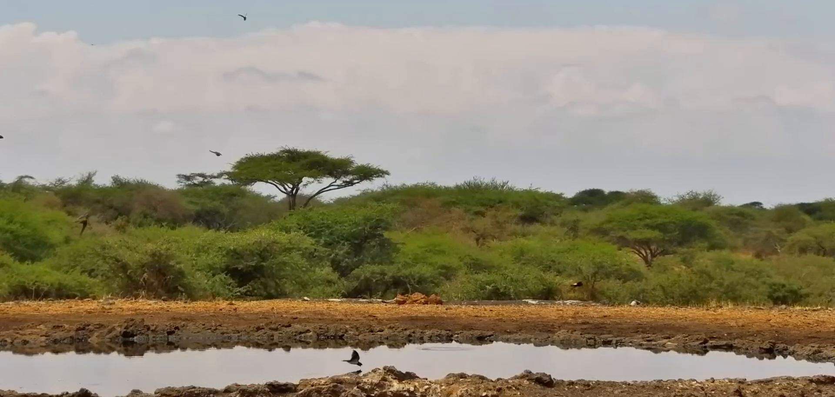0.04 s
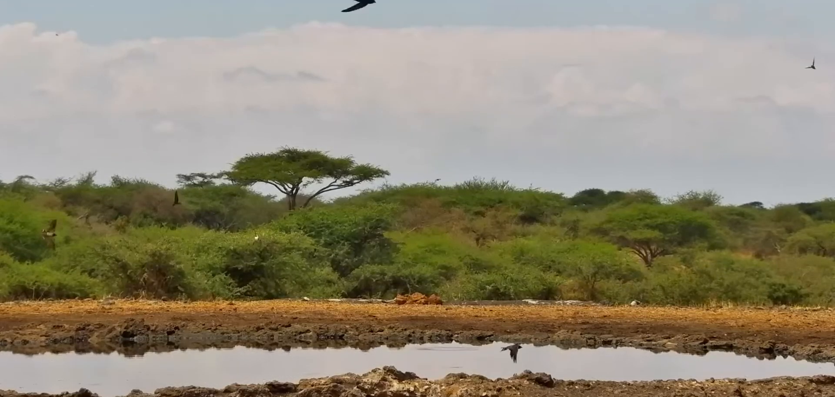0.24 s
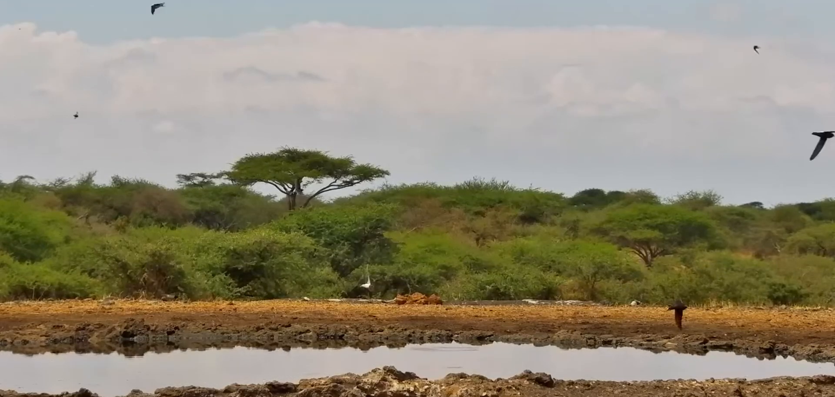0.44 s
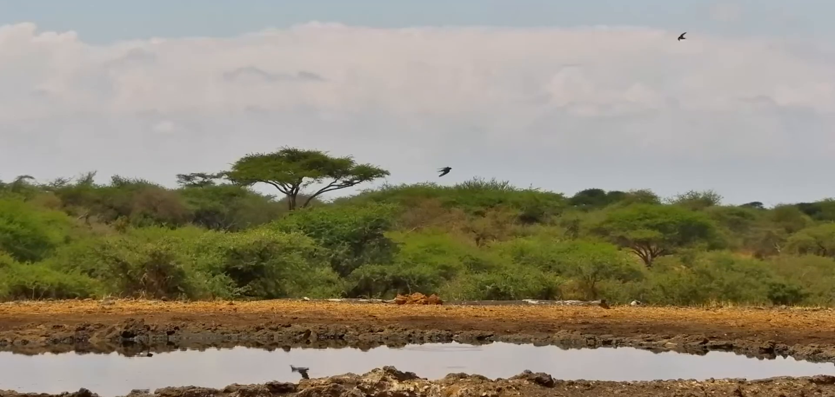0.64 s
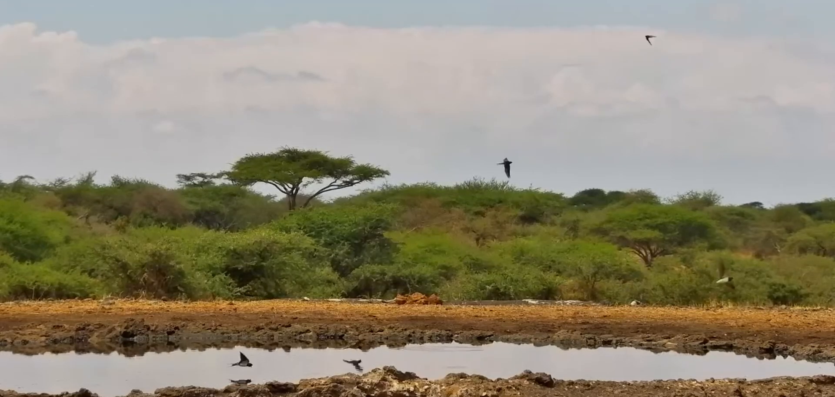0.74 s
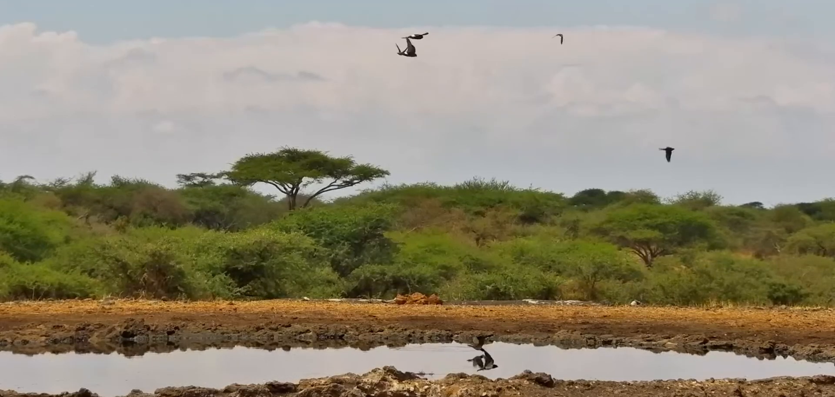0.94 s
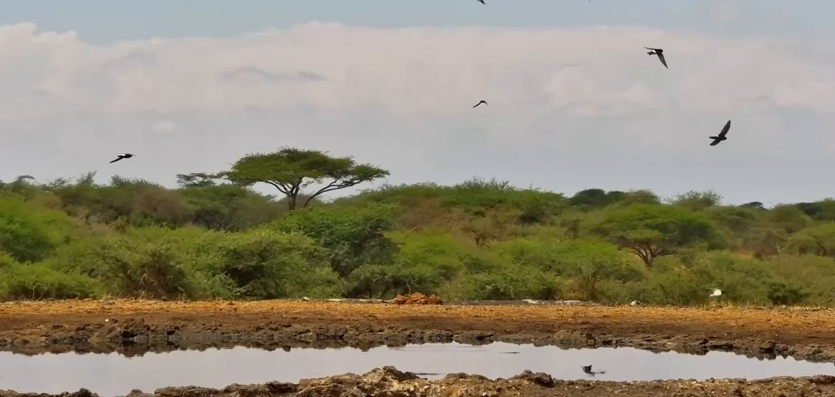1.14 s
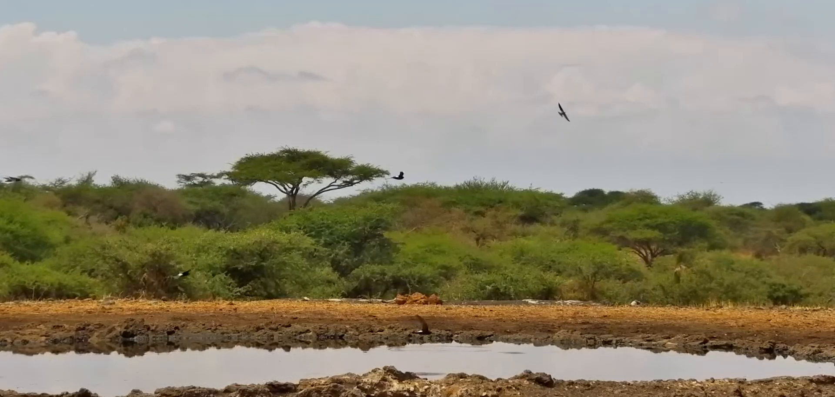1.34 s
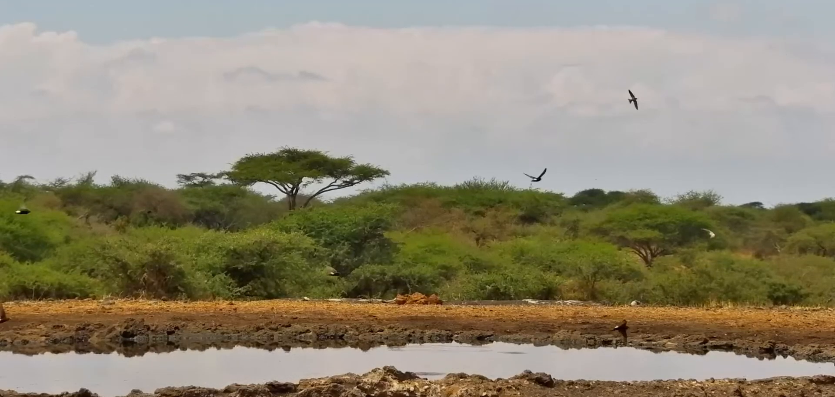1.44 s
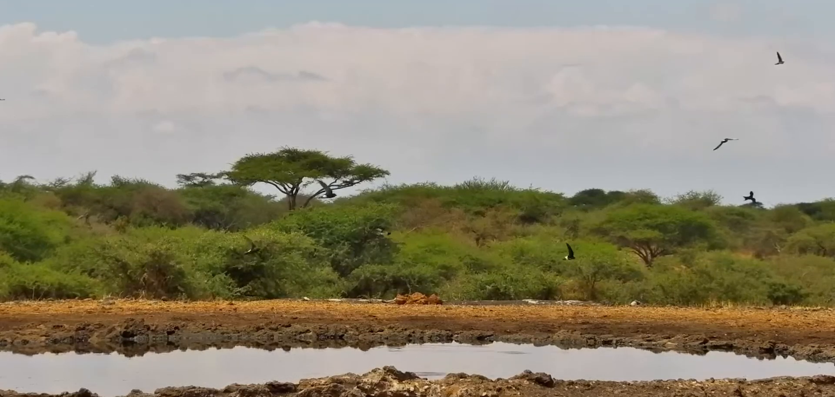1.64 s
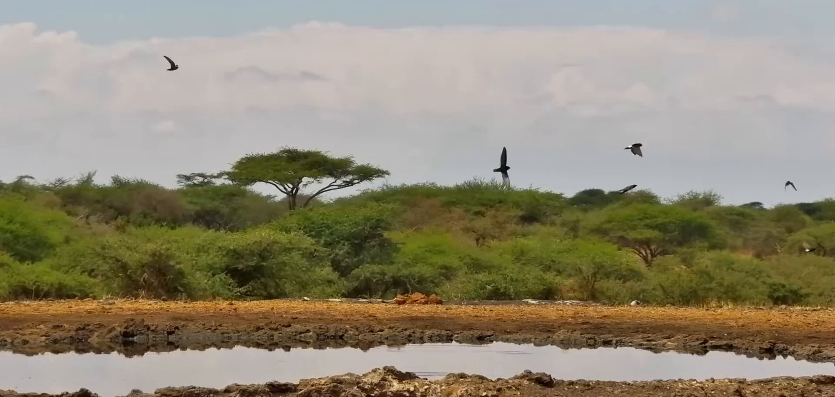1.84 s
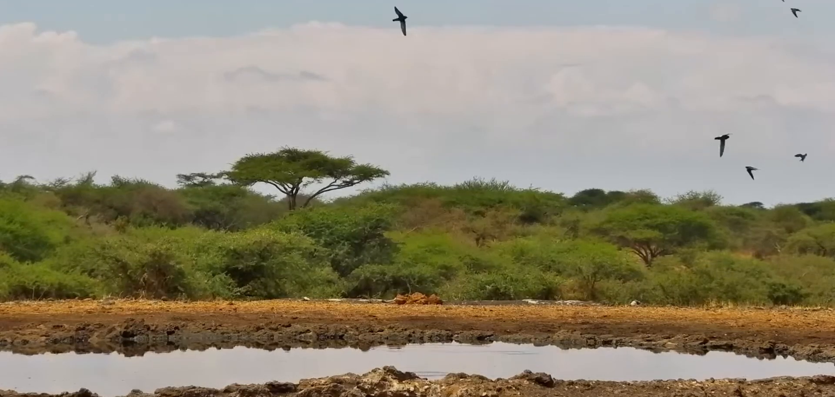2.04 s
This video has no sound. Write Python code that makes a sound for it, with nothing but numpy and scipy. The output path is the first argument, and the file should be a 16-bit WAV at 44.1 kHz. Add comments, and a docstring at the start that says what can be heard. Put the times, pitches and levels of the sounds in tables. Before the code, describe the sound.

Shrill, rapid trilling calls of passing swifts, first close and loud, then fainter and more crowded

```python
"""At a waterhole, swifts trill as they sweep over: short near-sine whistles slide and flick down at the end.
Each whistle gets one echo off the water and a tail of scattered echoes from the bush.
Shaped noise makes the faint rasps, one long faint whistle, the puffs of wind and the hiss;
wavering sines make the mains hum. The microphone housing colours the treble with resonances and a notch."""
import sys
import numpy as np
from scipy import signal
from scipy.fft import rfft, irfft
from scipy.io import wavfile
from scipy.ndimage import uniform_filter1d

SR = 44100
rng = np.random.default_rng(int(sys.argv[2]) if len(sys.argv) > 2 else 0)


def inscribe(sig):
    """Save sig as 16-bit PCM at rate SR to the path in sys.argv[1].

    A 1-D sig is mono; a 2-D sig holds one channel per row.
    Samples are clipped to [-1, 1] before scaling.
    """
    pcm = np.round(np.clip(np.atleast_2d(sig).T, -1, 1) * 32767)
    wavfile.write(sys.argv[1], SR, pcm.astype(np.int16))


N = 92610

# All levels hold before the microphone.
# Colour of the hiss, as points on a curve: pitch_hz, relative_level_db
HISS_COLOUR = [(20, -11), (50, -12), (100, 0), (190, -16.5), (600, -9), (760, -8.5), (900, -17),
               (1350, -10), (1750, -22.5), (2100, -18.5), (2850, -9.5), (3600, -19.5), (4300, -22.5),
               (5300, -20), (6100, -20), (7700, -36.5), (8900, -22), (10800, -28), (11200, -21),
               (11800, -34)]
HISS_DB, HISS_FLICKER_DB, HISS_TOP_HZ = -51.5, 1.0, 11900

# Mains hum tones: pitch_hz, level_db
HUM_TONES = [(150.7, -60.5), (247.6, -66), (349.9, -65.5)]
HUM_WAVER_DB = 2

# Wind puffs on the microphone: middle_s, length_s, top_hz, level_db
WIND_PUFFS = [(0.095, 0.055, 660, -48), (0.184, 0.061, 755, -47.5), (0.714, 0.023, 513, -51.5),
              (0.76, .04, 69, -53), (0.801, 0.15, 780, -50), (1.303, 0.048, 720, -49),
              (1.32, 0.1, 61.6, -55), (1.416, 0.041, 800, -51.5), (1.936, 0.0094, 700, -49),
              (2.028, 0.076, 510, -56.5)]

# Rasps, and one faint long whistle near 1390 Hz, all as band noise:
# middle_s, length_s, low_hz, high_hz, level_db
RASP_BANDS = [(0.331, 0.079, 1170, 2190, -50), (0.607, 0.082, 1084, 1760, -53.5),
              (0.934, 0.096, 1110, 1950, -51), (1.264, 0.086, 930, 1580, -50),
              (1.269, 0.074, 2300, 2720, -45.5), (1.27, 0.52, 1385, 1390, -57.5),
              (1.393, 0.024, 1210, 1560, -50), (1.72, 0.081, 1020, 1380, -49.5),
              (1.717, 0.087, 2140, 3150, -41), (1.743, 0.053, 2330, 2680, -40),
              (1.81, 0.073, 1240, 2180, -53.5), (2.075, 0.027, 1230, 1590, -52)]
RASP_GRAIN_DB, RASP_GRAIN_RATE_HZ = -1.5, 170  # the sign only flips the random walk

# Level of the flock's chatter over time: time_s, level_db
CHATTER_LEVEL = [(1.018, -61), (1.05, -43.5), (1.3, -42), (1.55, -46.5), (1.8, -52)]
CHATTER_COUNT = 280
CHATTER_LOW_HZ, CHATTER_HIGH_HZ, CHATTER_SLIDE_HZ = 2600, 5100, 800

# Trill notes: start_s, length_s, first_pitch_hz, last_pitch_hz, level_db
TRILL_NOTES = [(0.027, .012, 2860, 2740, -54), (0.184, 0.0075, 2790, 2640, -42.5),
               (0.192, 0.01, 4980, 5320, -36.5), (0.2, 0.015, 6040, 6040, -24),
               (0.211, 0.01, 4640, 4380, -32), (0.223, 0.0064, 4250, 2880, -20.5),
               (0.26, 0.0073, 4710, 4420, -30), (0.268, 0.019, 4210, 3966, -22.5),
               (0.283, .007, 3780, 2560, -27), (.289, 0.012, 5300, 5120, -31),
               (.290, 0.006, 3440, 4300, -27), (0.319, .005, 4955, 5180, -14.5),
               (0.325, 0.0066, 5090, 5410, -13.5), (0.332, 0.0075, 4520, 3494, -19.5),
               (0.373, 0.014, 3630, 4396, -20), (0.386, 0.0071, 4020, 2830, -30.5),
               (0.418, 0.019, 4908, 4696, -15.5), (0.461, 0.016, 4775, 4620, -17),
               (.505, 0.015, 4697, 4365, -19.5), (0.542, 0.01, 4347, 3853, -24.5),
               (0.574, 0.0098, 4490, 3840, -23), (0.604, 0.014, 4060, 3790, -28.5),
               (.632, 0.0079, 3900, 3770, -24), (0.656, .010, 3760, 3655, -26),
               (0.683, 0.011, 3617, 3580, -26.5), (0.704, 0.0035, 3760, 3320, -28.5),
               (.708, 0.0045, 4600, 5100, -37.5), (1.007, 0.0097, 6050, 5970, -30),
               (1.018, 0.0091, 4740, 4370, -28), (1.027, 0.0057, 4060, 3417, -31.5),
               (1.029, 0.0088, 7030, 6730, -40), (1.04, 0.015, 5220, 5140, -30.5),
               (1.058, 0.0095, 3640, 2680, -36), (1.07, 0.014, 4484, 4360, -24.5),
               (1.085, 0.0067, 7200, 5960, -37.5), (1.099, 0.0085, 4550, 5360, -33),
               (1.106, 0.017, 4753, 4670, -26), (1.131, 0.0074, 4560, 4460, -26.5),
               (1.144, 0.016, 4850, 4730, -27.5), (1.17, 0.013, 3760, 4350, -29),
               (1.176, 0.028, 4970, 4810, -24), (1.213, 0.014, 3430, 4380, -32.5),
               (1.224, 0.018, 4030, 3782, -30.5), (1.236, 0.0089, 4570, 5200, -28),
               (1.247, 0.0062, 5260, 4640, -23.5), (1.26, 0.0065, 3430, 4000, -28),
               (1.272, 0.0094, 4586, 4780, -27), (1.298, 0.005, 3760, 3660, -29),
               (1.296, 0.022, 4750, 4820, -29), (1.329, 0.016, 3730, 3730, -38),
               (1.346, 0.0069, 4530, 4700, -33), (1.354, 0.015, 5020, 4480, -29.5),
               (1.37, 0.0055, 4810, 3930, -27.5), (1.409, 0.0041, 2970, 2860, -35),
               (1.412, 0.02, 4380, 4270, -31.5), (1.457, 0.015, 3920, 4290, -34.5),
               (1.493, 0.0083, 3780, 4780, -31.5), (1.501, 0.016, 4080, 3870, -32.5),
               (1.519, 0.0069, 3680, 3930, -36), (1.543, 0.021, 3375, 4330, -35),
               (1.585, 0.015, 3050, 4130, -40.5), (1.623, 0.0052, 3080, 3730, -34.5),
               (1.627, 0.017, 3910, 3960, -39), (1.651, 0.0058, 3840, 3800, -36),
               (1.66, 0.0055, 3060, 3900, -35.5), (1.665, 0.0095, 3760, 3900, -36),
               (1.695, 0.014, 3860, 3950, -37), (1.727, 0.008, 3890, 3830, -32.5),
               (1.76, 0.0076, 3820, 3800, -36.5), (1.801, 0.016, 3950, 3716, -49),
               (2.004, 0.025, 3364, 2464, -49.5)]

# High ticks of one bird: start_s, level_db
HIGH_TICKS = [(1.033, -36), (1.316, -40), (1.372, -42.5), (1.424, -44), (1.472, -49), (1.519, -52),
              (1.583, -43.5), (1.624, -49.5), (1.662, -48), (1.694, -49)]
TICK_S, TICK_HZ = 0.0095, 6150

# Shape of one whistle
ATTACK_S, RELEASE_S = .002, .003
FLICK_HZ, FLICK_S, FLICK_DB = 2560, 0.0075, -18
WAVER_DB, WAVER_HZ, WAVER_RATE_HZ = 1.2, 35, 300
BREATH_DB, BREATH_RATE_HZ = -15, 1800
OCTAVE_DB, OCTAVE_LIFT_DB, OCTAVE_LIFT_HZ, OCTAVE_LIFT_WIDTH_HZ = -35, 13, 6700, 600

# Echoes; a T60 is the time a tail takes to fall by 60 dB
MIRROR_MAX_S, MIRROR_DB = .013, -16
BUSH_DB, BUSH_T60_S, BUSH_BLUR_RATE_HZ = -8.5, .14, 1100
BUSH_DELAY_S, BUSH_PATCHY_DB = .008, 3.5
FAR_DB, FAR_T60_S = -18, .3
VOICE_LOW_HZ, AIR_HZ = 2250, 11100

# Resonances of the microphone housing: pitch_hz, width_hz, lift_db
HOUSING_RESONANCES = [(2780, 670, 2.5), (3817, 460, 5.5), (4640, 390, 5), (5380, 210, 8.5),
                      (5960, 220, 3.5), (6550, 69, 7.5)]
HOUSING_LOSS_DB, OVERLOAD, TOP_HZ = 5, .05, 16000
NOTCH_HZ, NOTCH_WIDTH_HZ = 5640, 390


def undb(db):
    """Turn decibels into a plain factor."""
    return 10 ** (np.asarray(db) / 20)


def walk(rate_hz, size):
    """Random levels, each held for 1 / rate_hz seconds, then smoothed twice; spread near 1."""
    hold = int(SR / rate_hz)
    steps = np.repeat(rng.standard_normal(size // hold + 1), hold)
    smooth = uniform_filter1d(uniform_filter1d(steps, hold), hold)
    return 2.05 * smooth[:size]


def noise(low_hz, high_hz):
    """Noise kept between two pitches, with an rms of 1."""
    band = signal.butter(2, [low_hz, high_hz], "bandpass", fs=SR, output="sos")
    x = signal.sosfilt(band, rng.standard_normal(N))
    return x / x.std()


def swell(middle_s, length_s):
    """A smooth bell-shaped rise and fall in time."""
    t = np.arange(N) / SR
    return np.exp(-.5 * ((t - middle_s) / (length_s / 3.72)) ** 2)


def hiss():
    """Steady noise, coloured by pitch, with a slight flicker in level."""
    hz = np.fft.rfftfreq(N, 1 / SR) + 1  # the 1 avoids log(0)
    point_hz, point_db = np.array(HISS_COLOUR).T
    colour = undb(np.interp(np.log(hz), np.log(point_hz), point_db))
    steep_top = 1 / np.sqrt(1 + (hz / HISS_TOP_HZ) ** 80)
    x = irfft(rfft(rng.standard_normal(N)) * colour * steep_top, N)
    return x / x.std() * undb(HISS_DB + HISS_FLICKER_DB * walk(5.83, N))


def hum():
    """Sines near odd multiples of the mains pitch, each wavering in level."""
    t = np.arange(N) / SR
    out = np.zeros(N)
    for hz, db in HUM_TONES:
        level = np.sqrt(2) * undb(db + HUM_WAVER_DB * walk(11.55, N))  # root 2 turns rms into peak
        out += level * np.sin(2 * np.pi * (hz * t + rng.random()))
    return out


def puffs():
    """Wind on the microphone: short low thumps of band noise."""
    out = np.zeros(N)
    for middle_s, length_s, top_hz, db in WIND_PUFFS:
        out += undb(db) * swell(middle_s, length_s) * noise(top_hz / 5, top_hz)
    return out


def rasps():
    """Rasps, and one faint long whistle from a very narrow band: noise with quick random changes of level."""
    out = np.zeros(N)
    for middle_s, length_s, low_hz, high_hz, db in RASP_BANDS:
        grain = undb(db + RASP_GRAIN_DB * walk(RASP_GRAIN_RATE_HZ, N))
        out += grain * swell(middle_s, length_s) * noise(low_hz, high_hz)
    return out


def chatter():
    """List short notes of farther birds, at chance times and pitches."""
    time_s, level_db = np.array(CHATTER_LEVEL).T
    when, pitch, slide, size = rng.random((CHATTER_COUNT, 4)).T
    start_s = time_s[0] + (time_s[-1] - time_s[0]) * when
    length_s = 0.00382 + 0.0042 * size
    first_hz = CHATTER_LOW_HZ * (CHATTER_HIGH_HZ / CHATTER_LOW_HZ) ** pitch
    last_hz = first_hz + CHATTER_SLIDE_HZ * (2 * slide - 1)  # up or down
    return list(zip(start_s, length_s, first_hz, last_hz, np.interp(start_s, time_s, level_db)))


def echo_tail(db, t60_s, t):
    """Level of an echo tail that dies away evenly in decibels; db is its total strength."""
    return undb(db - 60 * t / t60_s) * np.sqrt(2 * np.log(1000) / (t60_s * SR))


def echoes(size):
    """Random scatter: a patchy mix of a near bush tail and a longer far tail, new at each call."""
    t = np.arange(size) / SR
    tails = np.hypot(echo_tail(BUSH_DB, BUSH_T60_S, t), echo_tail(FAR_DB, FAR_T60_S, t))
    build_up = np.clip(t / BUSH_DELAY_S, 0, 1) ** 2
    patches = undb(BUSH_PATCHY_DB * walk(100, size))
    return rng.standard_normal(size) * tails * build_up * patches


def note(length_s, first_hz, last_hz):
    """A wavering, hoarse whistle slides in pitch, then flicks down faintly; its overtone is breathy."""
    t = np.arange(2048) / SR
    after = np.clip((t - length_s) / FLICK_S, 0, 1)  # progress through the flick
    slide = (last_hz - first_hz) * np.clip(t / length_s, 0, 1)
    drop = (FLICK_HZ - last_hz) * np.clip(3 * after, 0, 1)  # done in a third of the flick
    hz = first_hz + slide + drop
    phase = 2 * np.pi * np.cumsum(hz + WAVER_HZ * walk(WAVER_RATE_HZ, 2048)) / SR

    waver = undb(WAVER_DB * walk(WAVER_RATE_HZ, 2048))
    breath = walk(BREATH_RATE_HZ, 2048)
    body = np.clip(t / ATTACK_S, 0, 1) * np.clip((length_s - t) / RELEASE_S + .5, 0, 1)
    flick = undb(FLICK_DB) * np.sin(np.pi * after) ** 2

    # The octave is louder near 6700 Hz, where the microphone is bright
    closeness = np.exp(-.5 * ((2 * hz - OCTAVE_LIFT_HZ) / OCTAVE_LIFT_WIDTH_HZ) ** 2)
    octave = undb(OCTAVE_DB + OCTAVE_LIFT_DB * closeness)
    whistle = (1 + undb(BREATH_DB) * breath) * np.sin(phase)
    overtone = octave * (.5 + breath) * np.sin(2 * phase)
    return waver * (body + flick) * (whistle + overtone)


def swifts():
    """Every note, its mirror echo off the water, and scatter whose pitch is blurred by the fast flight."""
    ticks = [(start_s, TICK_S, TICK_HZ, TICK_HZ, db) for start_s, db in HIGH_TICKS]
    out = np.zeros(N + SR)
    for start_s, length_s, first_hz, last_hz, db in [*TRILL_NOTES, *ticks, *chatter()]:
        direct = note(length_s, first_hz, last_hz) * undb(db)
        # Fast random changes of level spread the pitch
        blurred = direct * (1 + walk(BUSH_BLUR_RATE_HZ, 2048)) / np.sqrt(2)
        heard = signal.fftconvolve(blurred, echoes(6000))
        mirror_delay = int(MIRROR_MAX_S * SR * rng.uniform(0.41, 1))
        heard[:2048] += direct + undb(MIRROR_DB) * np.roll(direct, mirror_delay)
        start = int(start_s * SR)
        out[start:start + len(heard)] += heard
    return out[:N]


def scene():
    """Birds and rasps lose their highest treble in the air; puffs, hum and hiss join unfiltered."""
    voice_cut = signal.butter(6, VOICE_LOW_HZ, "highpass", fs=SR, output="sos")
    air_cut = signal.butter(8, AIR_HZ, fs=SR, output="sos")
    birds = signal.sosfilt(voice_cut, swifts())
    far = signal.sosfilt(air_cut, birds + rasps())
    return (far + puffs() + hum() + hiss())[None]


def resonance(x, hz, width_hz):
    """Keep only a narrow band, as a ringing cavity does."""
    return signal.lfilter(*signal.iirpeak(hz, hz / width_hz, fs=SR), x)


def record(dry):
    """The microphone rounds loud peaks a little; its housing notches and lifts bands; the top is cut."""
    x = dry - OVERLOAD * dry ** 3
    for _ in range(2):  # twice for a wider notch
        x = x - resonance(x, NOTCH_HZ, NOTCH_WIDTH_HZ)
    for hz, width_hz, lift_db in HOUSING_RESONANCES:
        x = x + (undb(lift_db) - 1) * resonance(x, hz, width_hz)
    top_cut = signal.ellip(8, .2, 70, TOP_HZ, fs=SR, output="sos")
    return signal.sosfilt(top_cut, undb(-HOUSING_LOSS_DB) * x)


dry = scene()
out = record(dry)
inscribe(out)
```